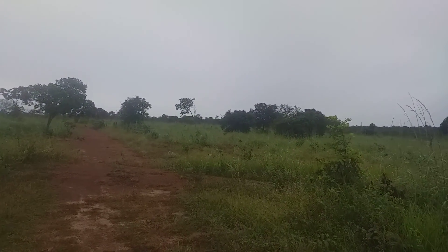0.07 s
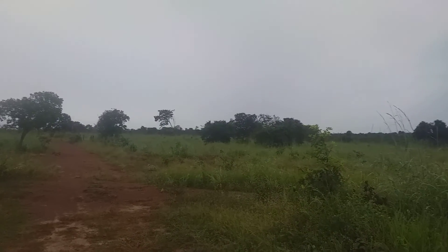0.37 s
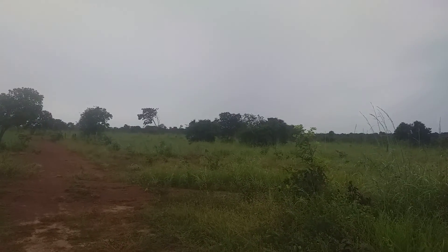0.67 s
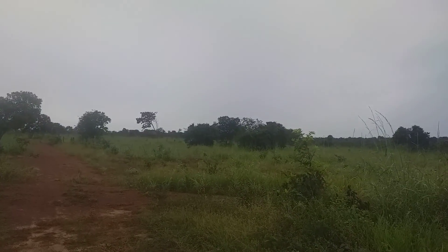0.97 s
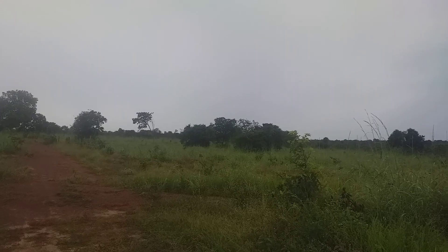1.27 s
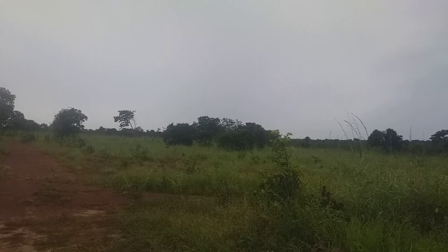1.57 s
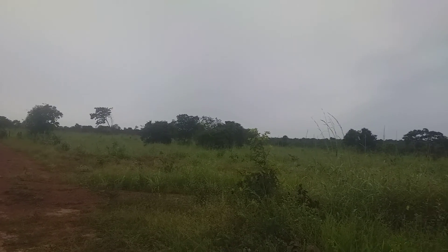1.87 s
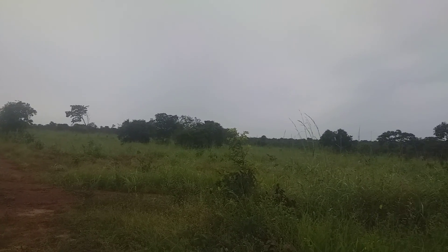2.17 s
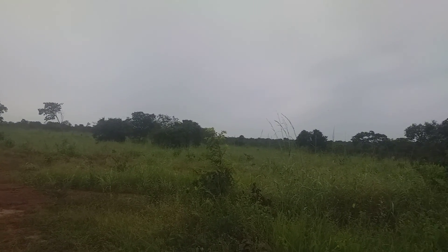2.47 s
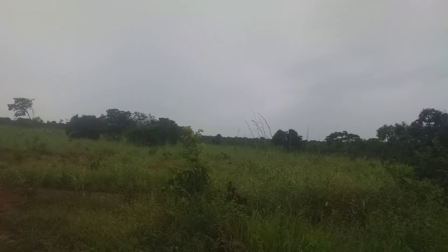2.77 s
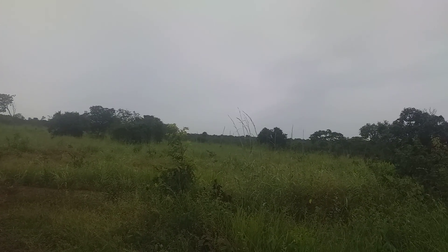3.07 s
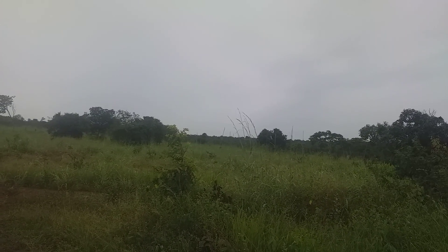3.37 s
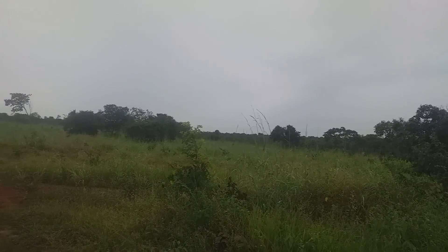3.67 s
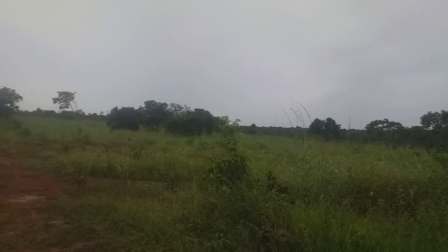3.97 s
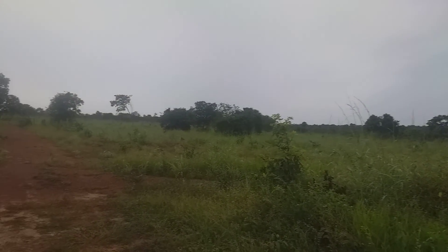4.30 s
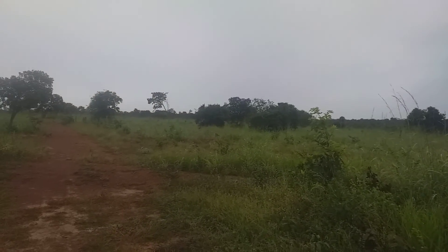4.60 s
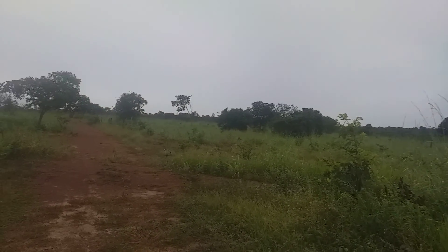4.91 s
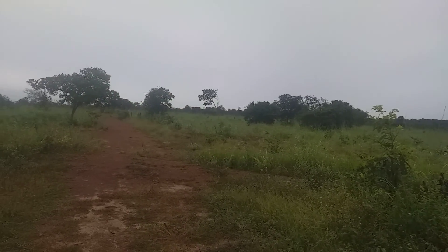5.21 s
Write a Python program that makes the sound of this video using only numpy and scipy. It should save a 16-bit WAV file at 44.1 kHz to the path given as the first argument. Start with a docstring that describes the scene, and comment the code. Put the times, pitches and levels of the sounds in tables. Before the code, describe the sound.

Crickets trill steadily in an open pasture while two large birds yelp a distant duet, with small bird chirps and light scuffs underfoot.

```python
"""Two seriemas yelp a duet far off in an open pasture; a line of trees throws their notes back.
Each yelp is a hoarse high crest, often with a scoop before it and a drop after it in a lower register.
Five crickets trill in the grass, wing file on scraper. Small birds whistle and rasp, three sharp ticks
sound close by, and near the end a run of falling chips grows louder. Grit and grass are scuffed
underfoot and the hand-held microphone takes a few soft bumps, over faint open air."""
import sys
import numpy as np
from scipy import signal
from scipy.fft import rfft, irfft, next_fast_len
from scipy.io import wavfile
from scipy.ndimage import map_coordinates

SR = 44100
rng = np.random.default_rng(int(sys.argv[2]) if len(sys.argv) > 2 else 0)


def materialize(psi):
    """Save the field psi as 16-bit PCM at rate SR to the path in sys.argv[1].

    A 1-D psi becomes a single channel; in a 2-D psi each row is a channel.
    """
    bounded = np.clip(np.atleast_2d(psi).T, -1, 1)
    quanta = np.round(bounded * 32767).astype(np.int16)
    wavfile.write(sys.argv[1], SR, quanta)


N = 240300

# reverberation of the pasture: f/Hz, t60/s
PASTURE_T60 = [(1000, .7), (2000, 0.61), (5500, 0.19), (12000, 0.23)]


def amp(db):
    """Decibels to gain."""
    return 10 ** (np.asarray(db) / 20)


def unit(x):
    """x at rms 1."""
    return x / np.sqrt(np.mean(x ** 2) + 1e-20)


def along(points, hz):
    """(f/Hz, value) points read on a log frequency axis."""
    f, values = np.transpose(points)
    return np.interp(np.log(hz + 1), np.log(f + 1), values)


def envelope(rows):
    """Gain per sample from (t/s, level/dB) rows, silent outside them."""
    t, db = np.transpose(rows)
    return amp(np.interp(np.arange(N) / SR, t, db, left=-120, right=-120))


def wobble(rate_hz, size):
    """Smooth random curve with rate_hz knots a second."""
    knots = rng.standard_normal(int(size * rate_hz / SR) + 4)
    return map_coordinates(knots, [np.arange(size) * rate_hz / SR])


def filtered(x, response):
    """Zero-phase filter; response maps Hz to gain."""
    size = next_fast_len(N + SR // 2)
    return irfft(rfft(x, size) * response(np.fft.rfftfreq(size, 1 / SR)), size)[..., :N]


def equalised(x, curve):
    """x through a (f/Hz, gain/dB) curve."""
    return filtered(x, lambda hz: amp(along(curve, hz)))


def noise(spectrum):
    """Noise at rms 1, shaped by (f/Hz, gain/dB) points."""
    return unit(equalised(rng.standard_normal(N), spectrum))


def add(track, at_s, sound):
    """Mix a sound into the track from at_s."""
    start = int(np.clip(round(at_s * SR), 0, N))
    track[start:start + len(sound)] += sound[:N - start]


def arch(hz, climb, sag):
    """Start, middle and end pitch of a slur; climb and sag of the ends are shares of hz."""
    return hz * np.array([1 - climb / 2 - sag, 1, 1 + climb / 2 - sag])


def glide(length_s, pitches_hz, jitter, jitter_rate_hz):
    """Progress u (0-1) and phase of an unsteady tone arching through three pitches."""
    u = np.linspace(0, 1, max(int(length_s * SR), 16))
    hz = np.polyval(np.polyfit([0, .5, 1], pitches_hz, 2), u)
    hz *= 1 + jitter * wobble(jitter_rate_hz, len(u))
    return u, 2 * np.pi * np.cumsum(hz) / SR


def gate(u, length_s, edge_s):
    """Soft opening and closing of a note."""
    return np.sin(np.pi / 2 * np.clip(np.minimum(u, 1 - u) * length_s / edge_s, 0, 1)) ** 2


def scatter(x, t60_curve, delay_s):
    """Scattering by plants: a delayed, smeared copy that decays by (f/Hz, t60/s) points."""
    hz, t, bins = signal.stft(rng.standard_normal(SR // 2), SR, nperseg=256)
    decay = amp(-60 * t / along(t60_curve, hz)[:, None])
    tail = signal.istft(bins * decay, SR, nperseg=256)[1]
    delayed = np.pad(x, (int(delay_s * SR), 0))
    return signal.fftconvolve(delayed, tail / np.linalg.norm(tail))[:N]


def air():
    """Faint open air and a late low rush, alike in both ears but for the highest hiss."""
    # spectra: f/Hz, gain/dB
    bed_spectrum = [(25, -19), (38, -22.5), (65, -1), (125, -0.5), (200, -10.5), (500, -17.5), (900, -19.5),
                    (1400, -15.5), (1900, -2.5), (2500, -19), (3400, -16.5), (4500, -15), (6200, -9),
                    (8000, -32), (11000, -23), (15500, -18.5)]
    rush_spectrum = [(150, -27), (280, 4.5), (380, 6.5), (550, -4), (900, -42.5)]
    # swells of the mid-band haze and the rush: t/s, level/dB
    haze_levels = [(0, -65), (.95, -72), (1.18, -83), (2.38, -73.5), (3.3, -74), (3.95, -86), (4.75, -65.5),
                   (5.22, -58.5), (5.45, -62)]
    rush_levels = [(4.74, -95), (4.85, -73), (5.07, -69), (5.3, -68), (5.45, -75)]
    haze_spectrum = [(1200, -33), (2100, -6.5), (3300, -1.5), (4600, -7), (6500, -6.5), (8500, -40)]
    bed = amp(-67) * noise(bed_spectrum) * amp(.47 * wobble(5.33, N))
    haze = envelope(haze_levels) * noise(haze_spectrum)
    rush = envelope(rush_levels) * noise(rush_spectrum)
    hiss = amp(-82) * noise([(5000, -23), (9000, -5), (15000, -4.5)])
    return bed + haze + rush + np.array([hiss, -hiss])


def handling(start_hz=230, end_hz=65, sink_s=.0077, rise_s=.0054, t60_s=.08):
    """Soft thuds through the camera body that sink in pitch as they die."""
    # bumps of the hand: t/s, level/dB
    bumps = [(1.471, -48), (2.968, -41.5), (4.675, -54), (5.405, -52)]
    thuds, t = np.zeros(N), np.arange(SR // 5) / SR
    phase = 2 * np.pi * np.cumsum(end_hz + (start_hz - end_hz) * np.exp(-t / sink_s)) / SR
    attack = 1 - np.exp(-t / rise_s)
    for at_s, db in bumps:
        add(thuds, at_s, amp(db + 3 - 60 * t / t60_s) * attack * np.sin(phase))
    return thuds


def crunch(pressure, spectrum, flicker_db):
    """Gritty noise that follows a pressure envelope."""
    grit = pressure * unit(rng.standard_normal(N) * amp(flicker_db * wobble(600, N)))
    return unit(equalised(grit, spectrum)) * np.std(grit)


def underfoot(bite_db_per_s=800, stone_t60_s=.044):
    """A sole bites into dirt and slides to rest; stones shift and grass brushes past."""
    # scuffs of the sole: peak t/s, level/dB, t60/s
    scuffs = [(.026, -44.5, .2), (.11, -54, 1.1), (.636, -46, .6), (.668, -41.5, .3), (.724, -47.5, .3)]
    # stone knocks and brushed grass: t/s, level/dB
    knocks = [(.027, -46), (.133, -46), (.664, -42), (.676, -39), (.684, -39), (.692, -41), (.737, -43),
              (.914, -54.5), (2.929, -58), (4.003, -62), (4.229, -61), (4.551, -46), (4.595, -49.5)]
    rustle_levels = [(4.42, -78), (4.5, -70), (4.535, -53), (4.72, -64), (4.82, -58), (5.45, -52)]
    # spectra: f/Hz, gain/dB
    soil_spectrum = [(300, -36), (600, -23.5), (1000, -8.5), (1500, 3), (2300, -1), (3300, -6.5),
                     (4600, -9.5), (6800, -8.5), (8500, -40), (15000, -34)]
    stone_spectrum = [(300, -33), (600, -23.5), (1000, -9.5), (1550, 5.5), (2100, 4), (2800, -18.5),
                      (4600, -23), (6800, -50), (8500, -55), (15000, -52)]
    grass_spectrum = [(500, -18), (1100, -13), (1600, 1), (2100, 5), (3000, -3), (4400, -7), (6500, -8),
                      (8500, -34), (15000, -42)]
    stones, t = np.zeros(N), np.arange(N) / SR
    for at_s, db in knocks:
        add(stones, at_s, amp(db - 60 * t / stone_t60_s))
    sole = np.zeros(N)
    for peak_s, db, t60_s in scuffs:
        below_peak_db = np.maximum(bite_db_per_s * (peak_s - t), 60 * (t - peak_s) / t60_s)
        sole = np.maximum(sole, amp(db - below_peak_db))
    return (crunch(sole, soil_spectrum, flicker_db=3.3)
            + crunch(stones, stone_spectrum, flicker_db=.7)
            + crunch(envelope(rustle_levels), grass_spectrum, flicker_db=3))


def ticks(length_s=.008):
    """Very short upward flicks of tone with a snap, scattered by the grass."""
    # close ticks: t/s, level/dB
    events = [(1.731, -44.5), (2.122, -32.5), (3.508, -29)]
    flicks = np.zeros(N)
    for at_s, db in events:
        u, main = glide(length_s, (5600, 6600, 7900), jitter=.028, jitter_rate_hz=1530)
        _, upper = glide(length_s, (8000, 11500, 12800), jitter=.033, jitter_rate_hz=610)
        _, snap = glide(length_s, (8500, 9200, 9500), jitter=.096, jitter_rate_hz=14000)
        swell = amp(-130 * (u - .5) ** 2)
        flick = swell * np.sin(main) + amp(-23) * np.sin(upper) + amp(-26) * np.sin(snap)
        add(flicks, at_s - length_s / 2, amp(db) * gate(u, length_s, edge_s=.0018) * flick)
    tail = scatter(flicks, [(6000, .22), (12000, .28)], delay_s=.003)
    # the low part is mostly soaked up, the top scatters on
    return flicks + equalised(tail, [(6500, -10), (7500, -12), (8400, -3), (10000, 1), (13000, -3.5)])


def chipping_bird(start_s=4.207, count=21, length_s=.023, gap_s=.0622, hurry_s=.007, settle_notes=4.5):
    """A close run of steeply falling chips: hurried at first, then steady and louder."""
    # effort over the run: t/s, level/dB
    effort = [(4.2, -59), (4.38, -53), (4.495, -52), (4.555, -44), (4.98, -42.5), (5.17, -37.5),
              (5.42, -36.5)]
    gaps_s = gap_s - hurry_s * np.exp(-np.arange(count - 1) / settle_notes)
    chips = np.zeros(N)
    for at_s in start_s + np.append(0, np.cumsum(gaps_s)):
        db = np.interp(at_s, *np.transpose(effort))
        u, phase = glide(length_s, (4150, 2600, 1550), jitter=.013, jitter_rate_hz=690)
        gain = amp(db - 2.5 - 31 * np.abs(u - .33)) * gate(u, length_s, edge_s=.004)
        add(chips, at_s - .008, gain * np.sin(phase))
    return chips + amp(-8) * scatter(chips, PASTURE_T60, delay_s=.01)


def distant_birds(rasp_s=.125):
    """Thin slurred whistles, and rasps: tones roughened by fast pitch jitter."""
    # whistles: start t/s, length/s, f/Hz, climb/share, level/dB
    whistles = [(.578, .032, 4830, .08, -56), (.768, .032, 4700, .1, -59), (.585, .04, 2560, .3, -68),
                (.795, .035, 7100, .01, -63), (.8, .028, 3800, .09, -59.5), (1.021, .064, 4040, .16, -61),
                (2.23, .034, 4320, .1, -55), (2.464, .066, 4000, -.04, -64),
                (2.627, .065, 3300, -.16, -57.5), (2.688, .032, 2520, -.25, -48),
                (2.78, .073, 3820, -.016, -63), (3.103, .078, 3760, -.057, -60.5),
                (3.204, .076, 4150, 0, -63), (3.775, .058, 4000, -.045, -60),
                (4.247, .071, 4390, .016, -64)]
    # raspy chatter: middle t/s, f/Hz, level/dB
    rasps = [(.479, 3300, -65.5), (1.552, 3300, -63.5), (2.235, 4100, -63.5), (2.345, 3700, -59.5),
             (2.725, 3350, -65.5), (3.259, 3200, -65), (3.453, 3500, -66), (3.77, 3200, -69),
             (4.299, 3200, -63)]
    calls = np.zeros(N)
    for at_s, length_s, hz, climb, db in whistles:
        u, phase = glide(length_s, arch(hz, climb, sag=.012), jitter=.019, jitter_rate_hz=520)
        gain = amp(db - 2.5 + .83 * wobble(300, len(u))) * gate(u, length_s, edge_s=.0072)
        add(calls, at_s, gain * np.sin(phase))
    for at_s, hz, db in rasps:
        u, phase = glide(rasp_s, (hz, hz, hz), jitter=.09, jitter_rate_hz=1300)
        gain = amp(db + 4 * wobble(300, len(u))) * gate(u, rasp_s, edge_s=.025)
        add(calls, at_s - rasp_s / 2, gain * np.sin(phase))
    return calls + amp(-4) * scatter(calls, [(3500, .43)], delay_s=.005)


def crickets():
    """Each wing stroke sweeps a file over a scraper: an arched tone pulse near the wing's resonance."""
    # wings: cricket, pulse rate/Hz, pulse length/s, start, middle and end f/Hz, jitter/share,
    # octave/dB, scattered sound/dB, its t60/s
    wings = [("near", 25.2, .018, 5770, 5820, 5730, .0039, -42.5, -14.5, .061),
             ("second", 25.3, .019, 5600, 5675, 5610, .0043, -41, -11.5, .17),
             ("low", 37, .02, 5060, 5220, 5060, .012, -36, -8.5, .31),
             ("fast", 41.4, .017, 5190, 5460, 5200, .012, -38, -6.5, .29),
             ("far", 10, .04, 6000, 6200, 6100, .014, -42, -2.4, .18)]
    # trills: cricket, first pulse t/s, last pulse t/s, level/dB
    trills = [("near", .029, .109, -40), ("near", .622, 1.336, -34.3), ("near", 1.847, 2.559, -34.4),
              ("near", 3.028, 3.703, -33.5), ("near", 4.251, 4.53, -36.2), ("near", 4.568, 4.768, -37.3),
              ("near", 4.807, 4.967, -34), ("near", 5.44, 5.48, -39), ("second", .35, 1.384, -43.5),
              ("second", 1.818, 2.961, -41.5), ("second", 3.39, 4.22, -41), ("second", 4.259, 5.44, -42),
              ("low", .02, .29, -45.5), ("low", .592, .95, -48), ("low", 1.18, 1.55, -48.5),
              ("low", 1.85, 2.13, -48), ("low", 2.36, 2.7, -50.5), ("low", 2.73, 2.85, -57.5),
              ("low", 2.955, 3.35, -50), ("low", 3.58, 3.95, -52), ("low", 4.16, 4.215, -54),
              ("low", 4.24, 4.52, -48.5), ("low", 4.78, 5.14, -50), ("fast", .09, .405, -45.5),
              ("fast", .73, 1.02, -51), ("fast", 1.29, 1.6, -49), ("fast", 1.9, 2.17, -54),
              ("fast", 2.48, 2.7, -51), ("fast", 3.67, 3.94, -50), ("fast", 4.25, 4.52, -47),
              ("fast", 4.85, 5.16, -46), ("far", .1, 5.38, -64)]
    chorus = np.zeros(N)
    for cricket, rate_hz, length_s, *pitches_hz, jitter, octave_db, scatter_db, t60_s in wings:
        song = np.zeros(N)
        for first_s, last_s, db in [row[1:] for row in trills if row[0] == cricket]:
            for at_s in np.linspace(first_s, last_s, round((last_s - first_s) * rate_hz) + 1):
                u, phase = glide(length_s, pitches_hz, jitter, jitter_rate_hz=700)
                phase += rng.uniform(0, 2 * np.pi)  # every stroke starts the wing afresh
                stroke_db = db + rng.normal(0, .46) + 1.35 * wobble(500, len(u))
                stroke = np.abs(np.sin(np.pi * u)) ** .62 * amp(stroke_db)
                tone = np.sin(phase) + amp(octave_db) * np.sin(2 * phase)
                add(song, at_s - length_s / 2, stroke * tone)
        # the microphone moves, so the scattering by nearby stems keeps changing
        turn_rad = 1.81 * wobble(1.996, N)
        stems = sum(share * scatter(song, [(5500, t60_s)], delay_s=.003)
                    for share in (np.cos(turn_rad), np.sin(turn_rad)))
        chorus += (song + amp(scatter_db) * stems) / np.hypot(1, amp(scatter_db))
    return chorus + amp(-19.5) * scatter(chorus, PASTURE_T60, delay_s=.02)


def yelp_part(length_s, pitches_hz, db, overtone_db, jitter, edge_s=.005):
    """One unbroken stretch of a seriema's voice: a hoarse whistle that swells and fades."""
    length_s += edge_s
    u, phase = glide(length_s, pitches_hz, jitter, jitter_rate_hz=450)
    waver_rad = .5 * wobble(500, len(u))  # overtones waver more than the fundamental
    odd = amp(db) * (np.sin(phase) + amp(-38) * np.sin(3 * phase + 2 * waver_rad))
    octave = amp(overtone_db) * np.sin(2 * phase + waver_rad)
    effort = amp(3.5 - 8.2 * (u - .5) ** 2 + 1.7 * wobble(400, len(u)) + 1.2 * wobble(88, len(u)))
    return effort * gate(u, length_s, edge_s) * (odd + octave)


def seriemas():
    """A full yelp scoops up, breaks into a high crest and back into a drop; the trees echo it."""
    # yelps: bird, crest start t/s, length/s, f/Hz, climb/share,
    # levels/dB of scoop, crest, drop and overtone (None = unsung)
    yelps = [("lead", .158, .082, 1915, -.005, None, -45.5, -59.5, -66),
             ("lead", .577, .037, 1870, .03, None, -58.5, None, -72),
             ("lead", .982, .079, 1802, .054, None, -49, -59, -66),
             ("mate", 1.044, .068, 2125, .043, None, -54, -54, -69),
             ("lead", 1.377, .082, 1745, .089, None, -51.5, -58.5, -69),
             ("mate", 1.448, .106, 2380, -.125, None, -54.5, -53.5, -68),
             ("lead", 1.766, .082, 1715, .08, None, -54, -54.5, -73),
             ("mate", 1.953, .032, 2300, -.05, -50, -51, -49.5, -72),
             ("lead", 2.167, .066, 1655, .045, -63, -58, -54.5, -74),
             ("mate", 2.29, .103, 1825, .01, None, -50.5, None, -78),
             ("lead", 2.538, .053, 1590, .06, -64, -57.5, -54, -73),
             ("mate", 2.66, .102, 1775, .026, None, -51.5, None, -68),
             ("lead", 2.903, .045, 1580, .022, -62, -53, -54, -77),
             ("mate", 3.069, .049, 2100, 0, -54.5, -57.5, None, -65),
             ("lead", 3.25, .058, 1548, .033, -61.5, -52, -55.5, -70),
             ("mate", 3.417, .049, 2048, .013, -54.5, -53.5, None, -69),
             ("lead", 3.621, .046, 1504, .027, -60.5, -49.5, -57.5, -70),
             ("mate", 3.76, .064, 1990, .04, -61, -62, None, -76),
             ("mate", 4.108, .059, 1965, -.01, -65.5, -65, None, -66),
             ("mate", 4.443, .052, 1940, .013, -64.5, -67, None, -68),
             ("mate", 4.75, .036, 1875, -.01, -61, -67, None, -65),
             ("mate", 5.096, .03, 1980, 0, -59.5, -68, None, -68),
             ("lead", 5.297, .076, 1328, 0, None, -59.5, None, -61)]
    # scoop by bird: time ahead of crest/s, length/s, start, middle and end f/crest f
    scoops = {"lead": (.035, .07, .742, .795, .842), "mate": (.058, .06, .725, .782, .868)}
    # drop by bird: length/s, start, middle and end f/crest f
    drops = {"lead": (.04, .852, .812, .755), "mate": (.022, .79, .76, .73)}
    # arch of the crest by bird: sag of both ends/share
    sags = {"lead": .007, "mate": .03}
    onset_s = .0025
    voice = np.zeros(N)
    for bird, at_s, crest_s, hz, climb, scoop_db, crest_db, drop_db, overtone_db in yelps:
        start_s = at_s - onset_s
        # the voice is purer before it drops
        crest = yelp_part(crest_s, arch(hz, climb, sags[bird]), crest_db, overtone_db - 2.5, jitter=.012)
        add(voice, start_s, crest)
        if scoop_db is not None:
            ahead_s, scoop_s, *ratios = scoops[bird]
            scoop = yelp_part(scoop_s, hz * np.array(ratios), scoop_db, overtone_db - 4.5, jitter=.021)
            add(voice, start_s - ahead_s, scoop)
        if drop_db is not None:
            drop_s, *ratios = drops[bird]
            drop = yelp_part(drop_s, hz * np.array(ratios), drop_db, overtone_db, jitter=.016)
            add(voice, start_s + crest_s, drop)
    voice = equalised(voice, [(2600, 0), (4100, -2.5), (4700, -16)])  # distance dulls the overtones
    grass = scatter(voice, [(2000, .28)], delay_s=.004)
    pasture = scatter(voice, PASTURE_T60, delay_s=.02)
    trees = scatter(voice, [(2000, .097)], delay_s=.168)
    return voice + amp(-14) * grass + amp(-12.5) * pasture + amp(-20) * trees


def scene():
    """Centred sources over the stereo air."""
    animals = seriemas() + crickets() + chipping_bird() + distant_birds()
    return animals + ticks() + underfoot() + handling() + air()


def record(dry):
    """The camera keeps nothing above its band limit."""
    return filtered(dry, lambda hz: hz < 15750)


dry = scene()
out = record(dry)
materialize(out)
```